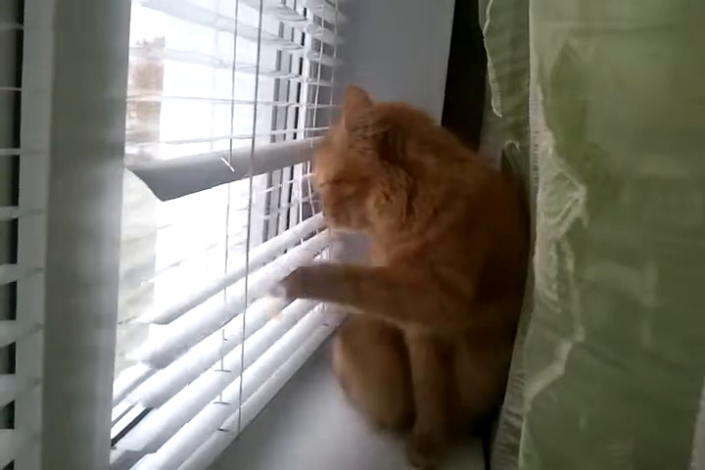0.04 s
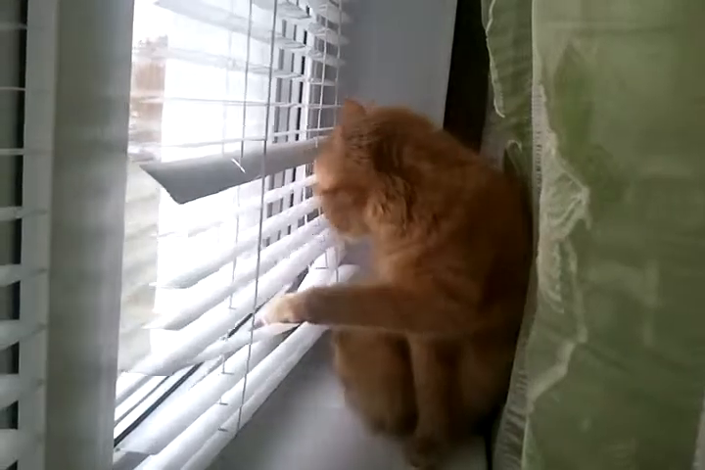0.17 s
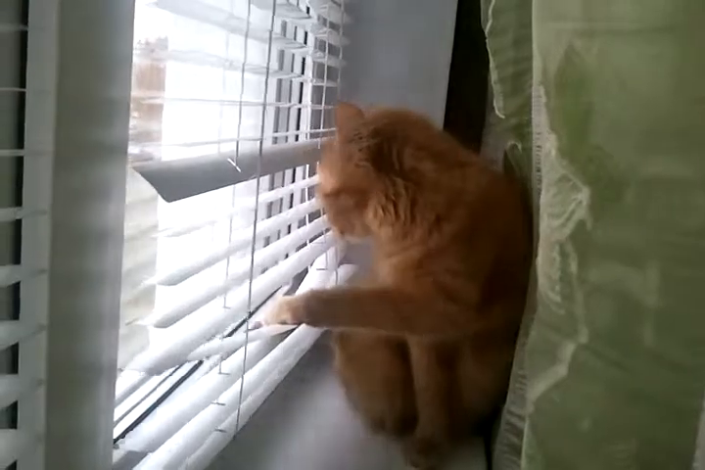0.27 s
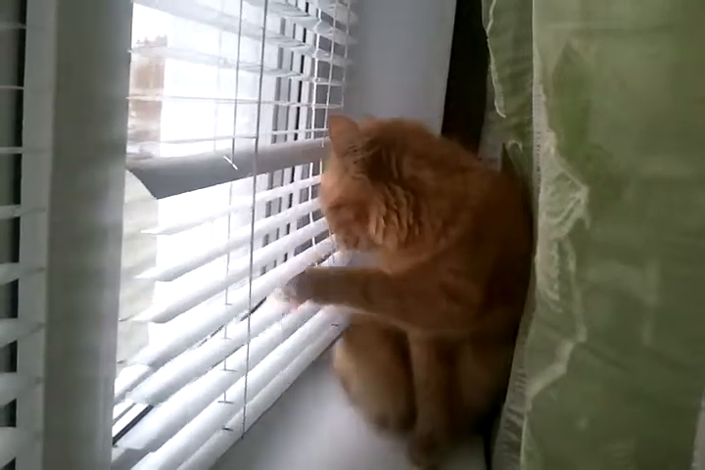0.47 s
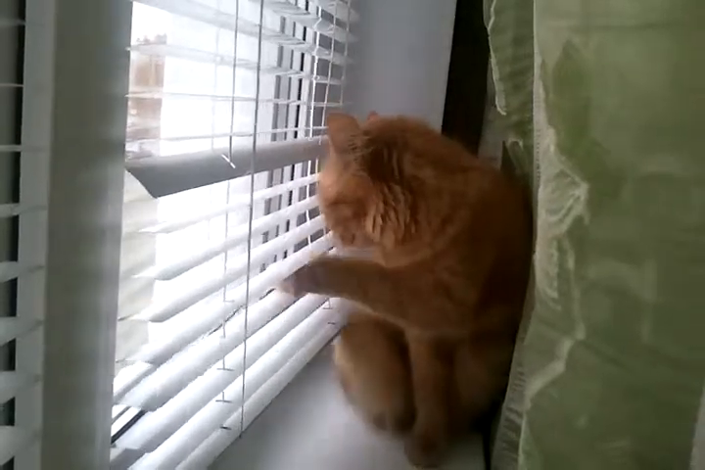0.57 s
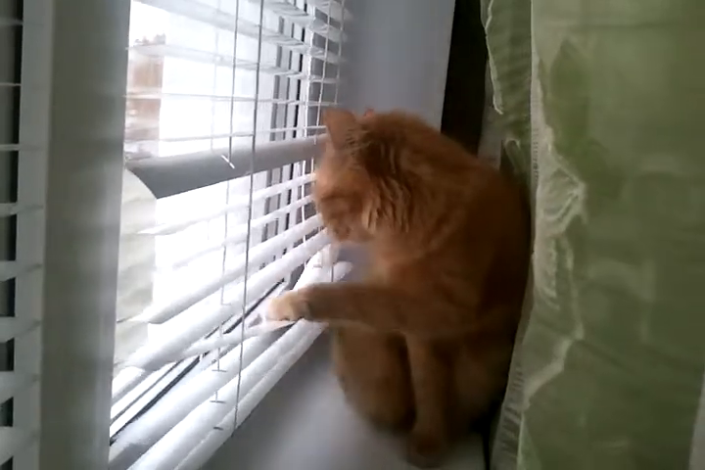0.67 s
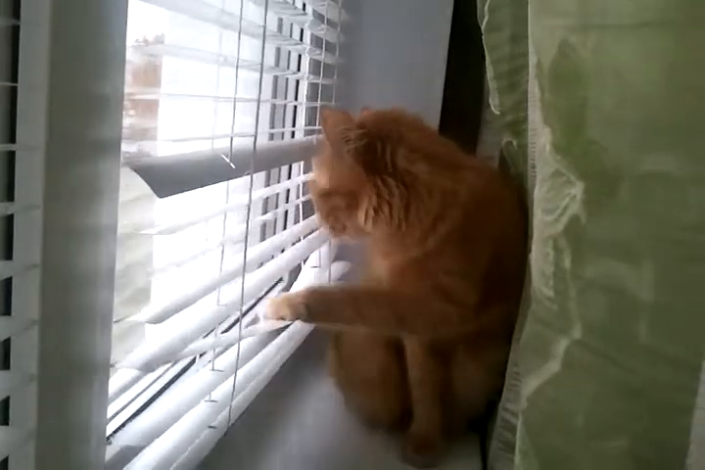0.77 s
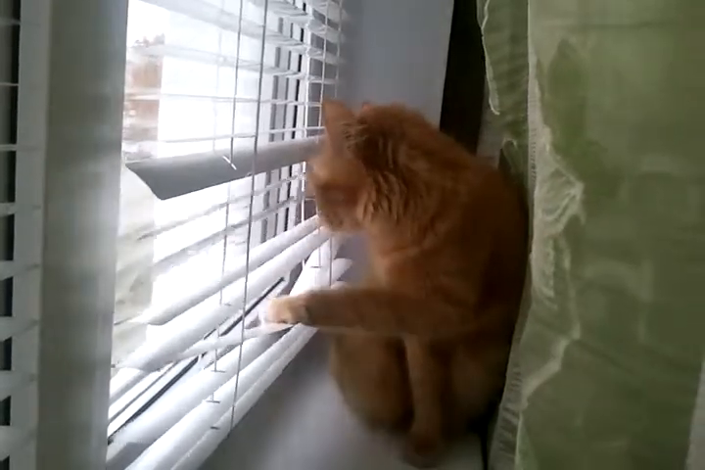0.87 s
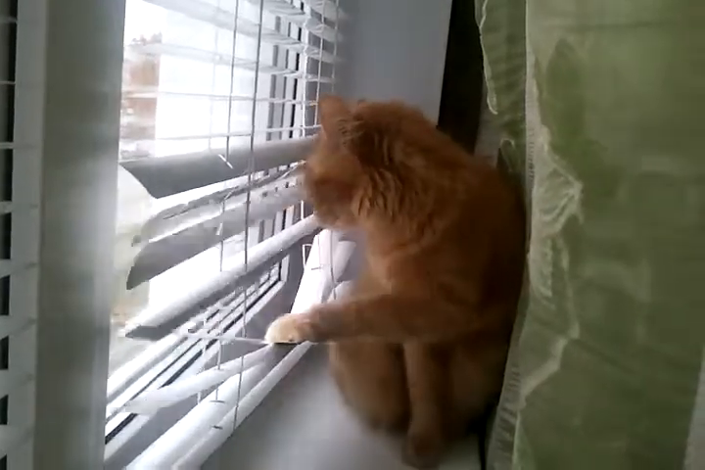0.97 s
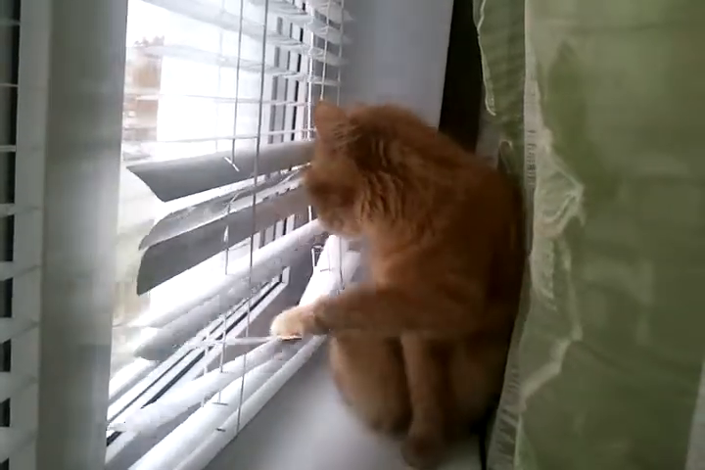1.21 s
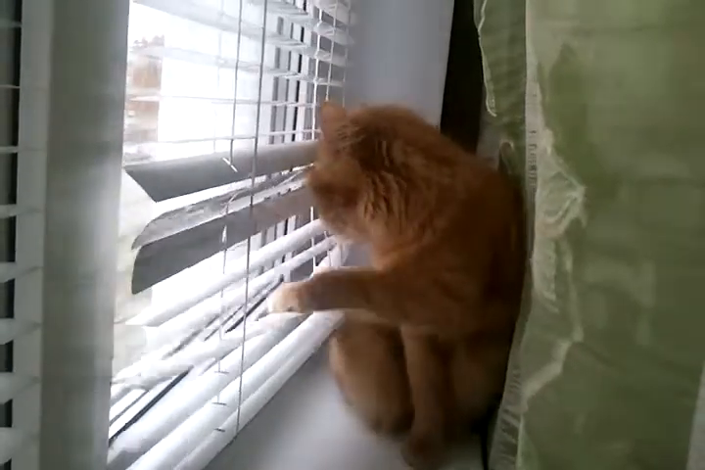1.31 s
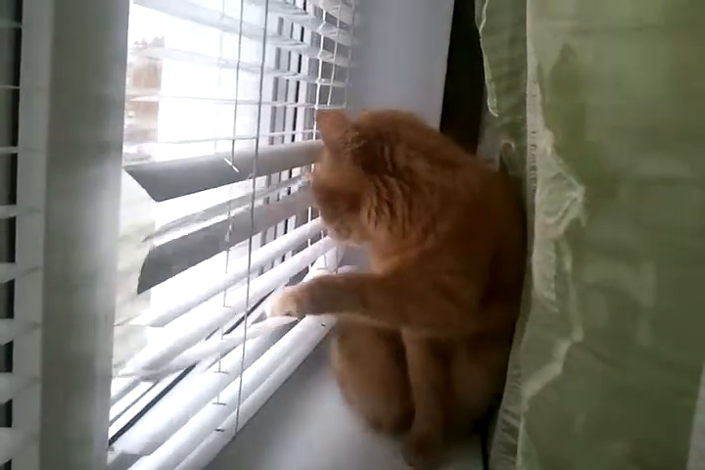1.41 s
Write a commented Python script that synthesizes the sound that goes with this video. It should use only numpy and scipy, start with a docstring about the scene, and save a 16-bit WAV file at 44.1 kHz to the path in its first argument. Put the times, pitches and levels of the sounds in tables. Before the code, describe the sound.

Plastic blind slats clack under a cat's paw. A light tap and faint twang open, then a hard, bright double clack at about 0.2 s with a smaller click at 0.28 s. After a lull from 0.35 to 0.55 s, clicks and scraping lead to a second sharp pair at 0.76 s. Lighter ticks, rubs and a faint twang at 1.3 s follow, in a small room with low rumble.

```python
"""A cat paws at a plastic venetian blind in a window recess. It opens on a plucked slat and soft taps,
then a hard double clack near 0.2 s; after a lull, more clacks lead to a second hard pair near 0.76 s.
Lighter clacks, scrapes and a second twang (1.3 s) follow. Contacts are bursts of filtered impacts plus
decaying sine modes; scrapes are streams of tiny slips. Reflections and a noise tail make the recess
and small room; filtered noise and steady sines make the rumble, hiss and hum beneath it all."""
import sys
import numpy as np
from scipy import signal
from scipy.fft import rfft, irfft, next_fast_len
from scipy.io import wavfile

SR = 44100
rng = np.random.default_rng(int(sys.argv[2]) if len(sys.argv) > 2 else 0)


def master_out(mix):
    """Clip the mix to full scale and print it as 16-bit PCM to the path in sys.argv[1]."""
    frames = np.transpose(np.atleast_2d(mix))
    ceiling = np.clip(frames, -1, 1)
    pcm = np.round(ceiling * 32767).astype(np.int16)
    wavfile.write(sys.argv[1], SR, pcm)


N = 63945  # length of the scene in samples

# slat contacts: (time [s], level before colour and room [dB], low shelf gain [dB], high shelf gain [dB],
#                 chatter t60 [s], ring gain [dB])
SLAT_CONTACTS = [(0.0132, -41.5, 18.5, 7, 0.023, 1), (0.0145, -35.5, 9.5, -13, 0.021, -4),
                 (0.112, -48, -1, -10, 0.057, 0), (.136, -59, -10, -3, .03, -4),
                 (0.182, -44, -3, -5, 0.064, -10), (0.1894, -39.5, 7, 0, 0.017, 0),
                 (0.215, -21, 2, 7, 0.015, -14), (0.2153, -17, -1.5, 3, 0.021, -5),
                 (.242, -43, 6, 1, .06, 3), (0.2803, -31, -7, 0, 0.015, 5.5),
                 (0.287, -38, 10.5, -8, 0.063, 1), (0.315, -51, -6, 7, 0.022, 6),
                 (0.5753, -33.5, 3.5, -30, 0.03, -1), (.578, -33, -5, -12.5, 0.015, -11),
                 (0.602, -57, -2, 4, 0.062, 0), (0.6233, -43.5, 3, 8.5, 0.053, 8.5),
                 (.630, -50, -26, 13, 0.029, 2), (0.6761, -41.5, -1, -2.5, 0.037, -5.5),
                 (.739, -49.5, -4, -7, 0.014, 4), (0.7609, -21, 1, 10, 0.017, -1.5),
                 (0.7636, -25, -18, 7, 0.025, -0.5), (0.8296, -41, 6, 14, .03, -2),
                 (0.8333, -33, 2.5, 8.5, 0.036, 3.5), (.851, -45, 0, 3, 0.076, -7),
                 (0.922, -55, 4, -7, 0.026, -9), (.972, -62.5, 5, -8, 0.042, 15.5),
                 (1.0309, -42, 4, -8, 0.039, 11), (1.040, -46, 4, -9, 0.085, -17),
                 (1.0537, -38.5, 0, 18, 0.019, 8.5), (1.063, -42.5, -2, 7, 0.048, 5.5),
                 (1.1084, -50, -15, 12, 0.04, 3.5), (1.2, -61, 3, 0, 0.05, -7),
                 (1.278, -57.5, 4, 9, 0.036, -8), (1.3016, -50, 9, -9, 0.04, -5),
                 (1.3504, -53, -2, 9, 0.041, 0), (1.3777, -40, -20, 8, 0.028, 1),
                 (1.443, -51, 6, 6, 0.036, -3)]
# spectrum of the chatter: (frequency [Hz], relative density [dB per Hz])
CHATTER_COLOUR = [(150, -36), (400, -29.5), (650, -20), (1100, -24.5), (1600, -24.5), (2150, -17.5),
                  (2700, -15.5), (3600, -23.5), (4400, -16.5), (5400, -6), (6700, 4), (8000, 0),
                  (9300, -0.5), (10600, -11), (12000, -10), (14500, -20)]
# modes of a slat, also stirred by the scrape: (frequency [Hz], mean level [dB], t60 [s])
SLAT_MODES = [(2197, -32, 0.18), (2440, -33.5, 0.19), (2740, -30, 0.13), (3174, -33, 0.11),
              (3630, -36.5, 0.25), (4470, -35, 0.25), (5230, -26, 0.21), (5740, -32, .19),
              (6320, -21, 0.066), (6700, -12, 0.047), (6983, -27, 0.068), (7430, -41, 0.1),
              (7836, -19, 0.16), (8230, -21.5, .14), (8700, -25, .14), (9300, -19, 0.098),
              (9200, -19, 0.12), (10400, -22, .13), (10160, -28.5, .13), (11770, -28, 0.19),
              (12630, -38, 0.27)]
LOW_SHELF_HZ, HIGH_SHELF_HZ = 3350, 9260


def clacks():
    """Each contact is a short chatter of plastic edges that leaves the slat ringing."""
    out = np.zeros(N)
    t = tail_time()
    for start, level_db, low_db, high_db, t60, ring_db in SLAT_CONTACTS:
        def tone(hz):
            lows = low_db * (1 - shelf(hz, LOW_SHELF_HZ))
            highs = high_db * shelf(hz, HIGH_SHELF_HZ)
            return lows + highs
        chatter = coloured(room(burst(t, t60, CHATTER_COLOUR)), tone)
        ringing = amp(ring_db) * ring(t, SLAT_MODES)
        add(out, start, amp(level_db) * (chatter + ringing))
    return out


# paw pushes: (time [s], level before the room [dB], t60 [s])
PAW_PUSHES = [(.183, -48.5, 0.03), (.287, -62, .07), (.5765, -45.5, 0.023), (0.733, -54.5, 0.048),
              (.813, -49, 0.077), (1.031, -59, .09), (1.068, -56.5, 0.06)]
# spectrum of a push: (frequency [Hz], relative density [dB per Hz])
PUSH_SPECTRUM = [(150, -13), (500, -5), (800, -7), (1300, 0.5), (1800, -2), (2400, 1), (3000, -11),
                 (4000, -12.5), (6000, -12), (14000, -52)]


def pushes():
    """The soft paw flexes a slat: a dull knock weak in treble."""
    out = np.zeros(N)
    t = tail_time()
    for start, level_db, t60 in PAW_PUSHES:
        knock = burst(t, t60, PUSH_SPECTRUM)
        add(out, start, amp(level_db) * room(knock))
    return out


# the paw lets a slat edge slip: (time [s], gain [dB])
SLAT_PLUCKS = [(0, -54.5), (1.303, -54.5)]
# modes of the plucked slat: (frequency [Hz], mean level [dB], t60 [s])
PLUCK_MODES = [(2210, -4, 0.066), (2950, -10.5, 0.07), (3270, -8, 0.058), (3580, -8, 0.16), (5740, 5, 0.2),
               (5700, -31, 0.084)]


def plucks():
    """A slat edge slips off the paw and twangs freely in its own modes."""
    return twangs(SLAT_PLUCKS, PLUCK_MODES)


# jolts to the whole blind: (time [s], gain [dB])
BLIND_JOLTS = [(.012, -53.5), (.185, -62), (.216, -55.5), (.58, -57), (.761, -60.5), (1.378, -63.5)]
# the blind's low note: (frequency [Hz], mean level [dB], t60 [s])
BLIND_NOTE = [(1126, -0.5, 0.47)]


def jolts():
    """A jolt sets the whole blind humming on one low note that dies away."""
    return twangs(BLIND_JOLTS, BLIND_NOTE)


# slats sliding on paw and cords: (time [s], slip level before colour and room [dB])
SLIDE_LEVEL = [(0, -56), (.035, -61.5), (.12, -58), (.19, -62), (.26, -90), (.315, -66), (.35, -77),
               (.40, -80), (.5, -63.5), (.57, -72.5), (.61, -51.5), (.65, -65.5), (.71, -68), (.80, -71),
               (.86, -52.5), (.895, -71), (1.0, -69), (1.03, -56), (1.135, -59), (1.165, -77.5),
               (1.34, -58), (1.45, -68.5)]
# spectrum of the rub: (frequency [Hz], relative gain [dB])
RUB_COLOUR = [(200, -23.5), (1100, -13), (2300, -9), (3100, -25.5), (4000, -17), (5200, -12), (7000, 2.5),
              (9000, -4), (11000, -6), (14500, -15)]
SLIPS_PER_S, SLIP_SCATTER_DB = 1700, 5  # mean rate of slips, random spread of their size
SLIDE_RING_DB = -6  # ringing of the modes beside the rub before the room


def scrape():
    """Dense tiny slips while slats slide; they also stir the modes."""
    t = np.arange(N) / SR
    happens = rng.uniform(size=N) < SLIPS_PER_S / SR
    sizes = rng.choice([-1, 1], N) * amp(SLIP_SCATTER_DB * rng.standard_normal(N))
    slide = amp(np.interp(t, *np.transpose(SLIDE_LEVEL)))
    force = unit(happens * sizes) * slide
    rub = unit(coloured(force, lambda hz: along(RUB_COLOUR, hz)))
    sing = unit(signal.fftconvolve(force, ring(tail_time(), SLAT_MODES))[:N])
    return np.std(force) * (room(rub) + amp(SLIDE_RING_DB) * sing)


# rumble and hiss spectrum: (frequency [Hz], relative gain [dB])
FLOOR_COLOUR = [(20, 4.5), (48, 0.5), (65, -21), (95, -7.5), (125, -1), (220, 2.5), (340, -12.5),
                (700, -14.5), (1500, -25), (4000, -31.5), (7000, -22), (14500, -29)]
# steady hum tones: (frequency [Hz], rms level [dB])
HUM_TONES = [(50, -72.5), (120, -68.5), (262, -75.5)]
FLOOR_DB = -58.5  # rms level of rumble and hiss together


def background():
    """Filtered noise gives room rumble and faint hiss; steady sines give the hum."""
    t = np.arange(N) / SR
    air = unit(coloured(rng.standard_normal(N), lambda hz: along(FLOOR_COLOUR, hz)))
    out = amp(FLOOR_DB) * air
    for hz, level_db in HUM_TONES:
        tone = np.sqrt(2) * np.sin(2 * np.pi * (hz * t + rng.uniform()))
        out += amp(level_db) * tone
    return out


# reverberation time of the tail: (frequency [Hz], t60 [s])
TAIL_T60 = [(300, 0.28), (1200, 0.26), (2500, 0.36), (6000, 0.17), (14000, 0.22)]
# colour of the tail: (frequency [Hz], gain [dB])
TAIL_COLOUR = [(300, 6.5), (1200, 3), (2500, -1), (5000, 2.5), (9000, -8.5), (14000, -2.5)]
ROOM_DB, ROOM_BUILD_S = -5.5, 0.002  # tail gain before its colour, build-up time constant
RECESS_DB, RECESS_S = -9, 0.008  # early reflections: summed energy, spread of their delays
TAIL_S = 0.28  # length of each event and of the room's answer


def room(x):
    """Direct sound, a few reflections from the recess and a diffuse tail decaying per frequency."""
    hz, t, z = signal.stft(rng.standard_normal(len(tail_time())), SR, nperseg=256)
    envelope = fade(t, along(TAIL_T60, hz)[:, None]) * (1 - np.exp(-t / ROOM_BUILD_S))
    tail = signal.istft(z * envelope, SR, nperseg=256)[1]
    tail /= np.linalg.norm(tail)
    answer = amp(ROOM_DB) * coloured(tail, lambda f: along(TAIL_COLOUR, f))
    walls = rng.uniform(size=(12, 2))
    for delay, sign in walls:
        bounce = np.sign(sign - 0.5) * amp(RECESS_DB) / np.sqrt(len(walls))
        add(answer, RECESS_S * (0.1 + delay), np.array([bounce]))
    answer[0] += 1  # direct sound
    return signal.fftconvolve(x, answer)[:len(x)]


MODE_ATTACK_S, MODE_SCATTER_DB = 0.0021, 2  # attack time constant, random spread of mode levels
MODE_WIDTH_HZ = 8.7  # the slats keep moving, which blurs their modes


def ring(t, modes):
    """A slat's modes, struck at a new spot each time and slowly losing their phase."""
    out = np.zeros(len(t))
    for hz, level_db, t60 in modes:
        gain = amp(level_db + MODE_SCATTER_DB * rng.standard_normal())
        steps = rng.standard_normal(len(t)) * np.sqrt(2 * np.pi * MODE_WIDTH_HZ / SR)
        drift = np.cumsum(steps)  # random walk of the phase
        out += gain * fade(t, t60) * np.sin(2 * np.pi * (hz * t + rng.uniform()) + drift)
    return out * (1 - np.exp(-t / MODE_ATTACK_S))


def twangs(events, modes):
    """Free ringing after a pluck or a jolt."""
    out = np.zeros(N)
    t = tail_time()
    for start, level_db in events:
        add(out, start, amp(level_db) * ring(t, modes))
    return out


ATTACK_S = 0.0002  # attack time constant of a burst
IMPACT_SCATTER_DB = 2.5  # spread in size of the tiny impacts within one burst


def burst(t, t60, colour):
    """A quickly dying run of tiny impacts with the given spectrum."""
    shape = fade(t, t60) * (1 - np.exp(-t / ATTACK_S))
    sizes = amp(IMPACT_SCATTER_DB * rng.standard_normal(len(t)))
    impacts = rng.choice([-1, 1], len(t)) * sizes
    x = coloured(shape * impacts, lambda hz: along(colour, hz))
    return x * np.linalg.norm(shape) / np.linalg.norm(x)  # colour leaves the energy unchanged


def tail_time():
    """Time axis of one event."""
    return np.arange(round(TAIL_S * SR)) / SR


def amp(db):
    """Decibels to gain."""
    return 10 ** (np.asarray(db) / 20)


def unit(x):
    """Scaled to rms 1."""
    return x / np.sqrt(np.mean(x ** 2) + 1e-20)


def along(points, hz):
    """(frequency [Hz], value) points read on a log frequency axis."""
    f, v = np.transpose(points)
    return np.interp(np.log(hz + 1), np.log(f + 1), v)


def fade(t, t60):
    """Exponential decay, down 60 dB after t60."""
    return np.exp(-np.log(1000) * t / t60)


def coloured(x, db_of_hz):
    """x through a causal minimum-phase filter with the given gain curve."""
    m = 2 * next_fast_len(len(x) // 2 + 2048, True)
    log_gain = np.log(amp(db_of_hz(np.fft.rfftfreq(m, 1 / SR))))
    cepstrum = irfft(log_gain, m)
    cepstrum[1:m // 2] *= 2  # fold onto positive time
    cepstrum[m // 2 + 1:] = 0
    response = np.exp(rfft(cepstrum))
    return irfft(rfft(x, m) * response, m)[:len(x)]


def shelf(hz, edge_hz, order=8):
    """Rises from 0 below the edge to 1 above."""
    return 1 - 1 / (1 + (hz / edge_hz) ** order)


def add(out, start, x):
    """Mixes x in at the start time in seconds."""
    i = max(round(start * SR), 0)
    out[i:i + len(x)] += x[:max(len(out) - i, 0)]


def scene():
    """The blind over the quiet room."""
    blind = clacks() + pushes() + plucks() + jolts() + scrape()
    return (blind + background())[None]


TOP_HZ = 14550  # upper band limit


def record(dry):
    """Rolls the treble off steeply above the band limit, 1 dB per 12 Hz down to -80 dB."""
    return coloured(dry[0], lambda hz: np.clip((TOP_HZ - hz) / 12, -80, 0))[None]


dry = scene()
out = record(dry)
master_out(out)
```